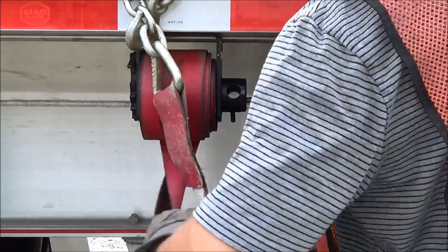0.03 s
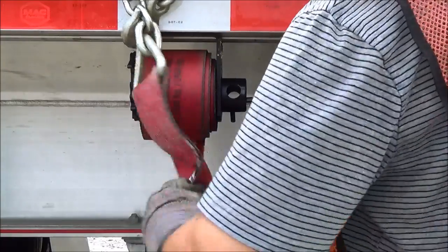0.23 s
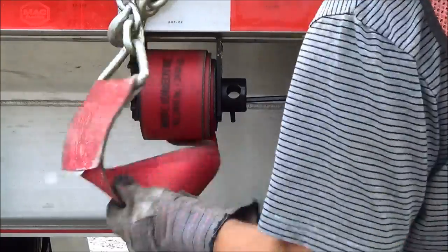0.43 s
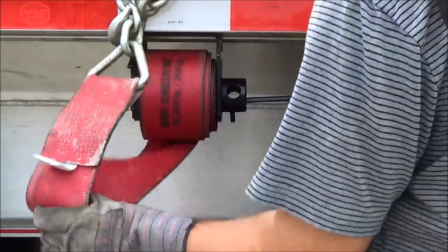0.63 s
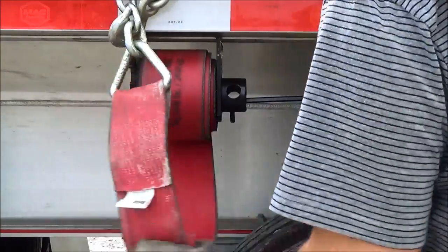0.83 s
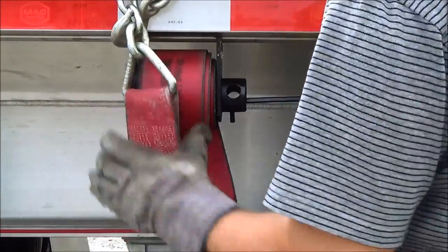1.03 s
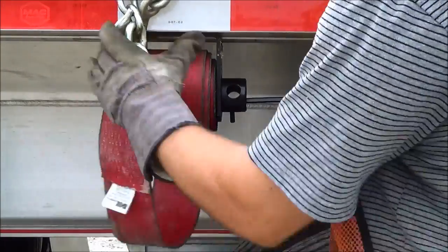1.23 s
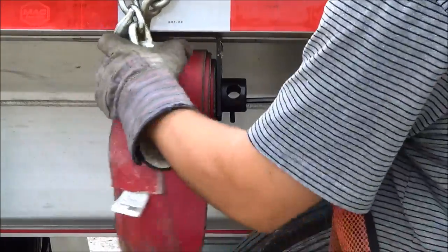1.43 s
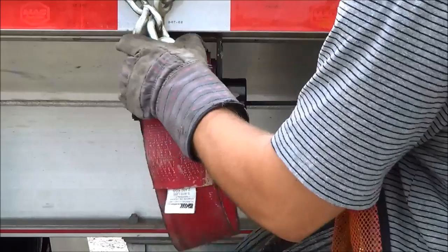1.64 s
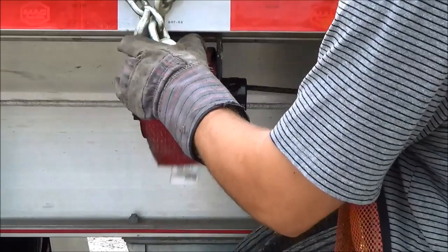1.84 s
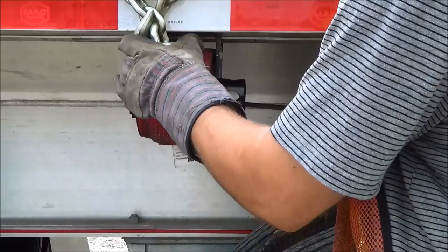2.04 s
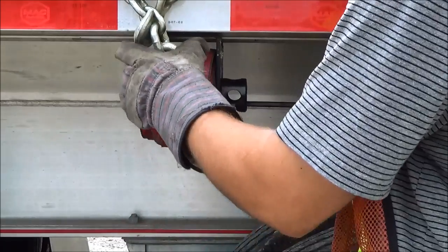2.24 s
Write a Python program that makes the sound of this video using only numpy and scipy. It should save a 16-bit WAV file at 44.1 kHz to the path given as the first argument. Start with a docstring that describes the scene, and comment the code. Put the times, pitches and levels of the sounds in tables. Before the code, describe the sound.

Chain links clink close by, with a few clanks from a hook as a strap is handled on a trailer outdoors. The clinking thins out, then builds into a busier, dragging rattle, with soft rustling and a steady low rumble beneath.

```python
"""At the winch of a flatbed trailer: a steel chain and hook clink and knock as a gloved hand moves a strap.
Free links ring until a neighbour stops them; then the chain drags over the trailer's edge in small slips.
The trailer's side answers each blow. Webbing rustles, a low outdoor rumble lies beneath,
and a limiter holds the peaks."""
import sys
import numpy as np
from scipy import signal
from scipy.fft import rfft, irfft, next_fast_len
from scipy.io import wavfile
from scipy.ndimage import uniform_filter1d, minimum_filter1d, map_coordinates

SR = 44100
rng = np.random.default_rng(int(sys.argv[2]) if len(sys.argv) > 2 else 0)


def unload_audio(sound):
    """Save the sound as a 16-bit wav file, at the path given as the first command line argument."""
    columns = np.transpose(np.atleast_2d(sound))
    # keep every value between -1 and 1, then stretch to whole-number steps
    steps = np.round(np.clip(columns, -1, 1) * 32767)
    wavfile.write(sys.argv[1], SR, steps.astype(np.int16))


N = 105840


def clinks():
    """Link hits link: a short crack, then the dense ring of chain and trailer."""
    # contacts: start_s, body_db, middle_db, treble_db, top_db
    contacts = [(0.2389, -24.5, -14, -18.5, -37), (0.3132, -23, -29.5, -29.5, -48),
                (0.3414, -53, -47, -20.5, -31), (.347, -34, -28, -17.5, -40), (0.372, -44, -21.5, -23, -51),
                (.449, -29, -23.5, -22.5, -48), (.459, -33, -22.5, -40, -49), (.585, -51, -19, -23, -39),
                (0.9436, -27.5, -29.5, -45, -54), (1.4807, -58, -28.5, -37.5, -79),
                (1.582, -22.5, -29.5, -39.5, -35.5), (1.64, -34, -24, -24, -29),
                (1.7238, -22, -25, -21, -31), (1.791, -43, -16.5, -26.5, -26),
                (1.8804, -17, -18.5, -17.5, -17), (1.932, -16, -24, -24.5, -27.5),
                (2.0204, -21, -30, -25.5, -24.5), (2.145, -20.5, -20, -36.5, -70)]
    out, t = np.zeros((2, N)), np.arange(SR // 2) / SR
    crack = amp(-3.5) * fade(t, t60_s=0.042)
    for start_s, *levels_db in contacts:
        ring = steel(noise(len(t)))
        for k, level_db in enumerate(levels_db):
            envelope = np.hypot(crack, trailer_answer(k, t))
            add(out, start_s, amp(level_db) * band(ring, k) * envelope)
    return out


def hook_knocks():
    """The strap-damped hook clanks in its link; where it is struck weights its low modes."""
    # blows: start_s, level_db, low_lift_db
    blows = [(.116, -36.5, -6), (.347, -11.5, -18), (.586, -21.5, -6), (.943, -14.5, 5.5),
             (1.31, -31.5, -5),(1.482, -22, -1.5), (1.521, -26.5, -2), (1.573, -23.5, -12),
             (2.146, -37.5, 7)]
    # hook modes: pitch_hz, level_db
    modes = [(715, -17), (820, -13.5), (1290, -5), (1440, 0), (1620, -15)]
    # spectrum of the trailer's answer: freq_hz, relative_db
    answer_spectrum = [(120, -59), (200, -22), (616, -9), (860, 1), (985, -15.5), (1370, -1), (1670, -13),
                       (6000, -81)]
    scatter_db, detune, shelf_hz = 1.2, 0.015, 1050
    out, t = np.zeros((2, N)), np.arange(SR // 2) / SR
    for start_s, level_db, low_lift_db in blows:
        ring = np.zeros(len(t))
        for pitch_hz, mode_db in modes:
            ring += amp(mode_db + rng.normal(0, scatter_db)) * sine(pitch_hz * rng.normal(1, detune), t)
        ring *= rise(t, tau_s=0.00039) * fade(t, t60_s=0.066)
        answer = coloured(answer_spectrum, len(t)) * rise(t, tau_s=0.015) * fade(t, t60_s=0.28)
        clank = amp(level_db) * (ring + amp(-7) * answer)
        add(out, start_s, filtered(clank, lambda hz: amp(low_lift_db / (1 + (hz / shelf_hz) ** 10))))
    return out


def free_rings():
    """Links, hook and edge sing, wavering and chattering as they swing, until a neighbour damps them."""
    # modes by part name: pitch_hz, level_db, t60_s
    part_modes = {"first link": [(8848, 0, .9), (4712, -10, .5), (3980, -14, .35), (4377, -18, .5),
                  (5981, -21, .5), (10935, -20, .35)], "small link": [(10522, 0, .3), (10680, -11, .6)],
                  "long link": [(4692, 0, .25), (10670, -15, .45)], "singing link": [(8846, 0, .95)],
                  "heavy link": [(4398, 0, .2), (5787, -4, .2), (1852, -2, .2)],
                  "tapped link": [(4016, 0, .06), (4339, -9, .2)], "middle link": [(5711, 0, .3)],
                  "short link": [(10840, 0, .25), (10530, -1, .1), (5706, -2, .4)], "hook": [(850, 0, .5),
                  (1420, 3, .14)], "trailer edge": [(320, 0, .55), (440, -2, .35)]}
    # free spells: start_s, part, level_db, free_s
    spells = [(0.214, "first link", -52, 0.04), (0.24, "first link", -12, 0.032),
              (.252, "hook", -23.5, 0.046), (0.293, "small link", -27, 0.017),
              (0.342, "singing link", -39.5, .22), (0.369, "long link", -27, 0.068),
              (.385, "trailer edge", -29.5, 0.33), (0.587, "heavy link", -35, 0.052),
              (1.31, "tapped link", -37.5, 0.046), (1.638, "middle link", -26, .3),
              (1.88, "short link", -29.5, 0.28), (2.024, "short link", -32.5, 0.038)]
    waver_db, waver_per_s, chatter_per_s = 2.7, 70, 600
    out, t = np.zeros((2, N)), np.arange(SR // 2) / SR
    for start_s, part, level_db, free_s in spells:
        damping = fade(np.maximum(t - free_s, 0), t60_s=0.2)
        for pitch_hz, mode_db, t60_s in part_modes[part]:
            depth_db = waver_db * (1 - mode_db / 20)  # weak modes waver most
            waver = amp(depth_db * wander(t * waver_per_s, knots=200))
            chatter = 1 + 0.28 * wander(t * chatter_per_s, knots=600)
            tone = amp(level_db + mode_db) * sine(pitch_hz, t) * fade(t, t60_s)
            add(out, start_s, tone * waver * chatter * damping)
    return out


def chain_drag():
    """Many small slips rattle the trailer's edge, which booms under the pull."""
    # rattle envelope: time_s, body_db, middle_db, treble_db
    rattle_levels = [(1.54, -39, -46, -74), (1.62, -30.5, -39.5, -65), (1.715, -29.5, -34, -59),
                     (1.76, -30, -32.5, -40), (1.83, -25.5, -24.5, -34.5), (1.92, -23.5, -21, -34),
                     (2.0, -22, -24, -44), (2.04, -30.5, -31, -47), (2.3, -44, -64, -90)]
    # boom envelope: time_s, level_db
    boom_levels = [(1.8, -36), (1.92, -37.5), (2.0, -33.5), (2.11, -33), (2.3, -49)]
    # boom spectrum: freq_hz, relative_db
    boom_spectrum = [(30, -63), (90, -10.5), (300, -17), (700, -80)]
    slips_per_s, scatter_db, answer_db = 140, 3.5, 4
    t = np.arange(SR // 4) / SR
    onsets = rng.random(N) < slips_per_s / SR
    slips = onsets * amp(scatter_db * rng.standard_normal(N)) * rng.choice([-1, 1], N)
    grains = rattle(slips, fade(t, t60_s=0.02))
    out = amp(curves(boom_levels, outside_db=-120)) * coloured(boom_spectrum, N)
    body_db, middle_db, treble_db = curves(rattle_levels, outside_db=-120)
    top_db = treble_db - 4.5
    for k, level_db in enumerate([body_db, middle_db, treble_db, top_db]):
        answer = amp(answer_db) * rattle(slips, trailer_answer(k, t))
        out += amp(level_db) * band(steel(grains + answer), k)
    return out


def rattle(slips, envelope, segments=20):
    """Each slip rings as a noise burst; the ring changes as the chain moves on."""
    out, step = np.zeros((2, N)), N // segments
    for i in range(0, N, step):
        ring = noise(len(envelope)) * envelope
        add(out, i / SR, signal.fftconvolve(slips[None, i:i + step], ring))
    return unit(out)


def trailer_answer(k, t):
    """Envelope of the trailer's side in band k: builds after a blow, then dies away."""
    # one value per band, body to top
    level_db = [-4, -2.5, -3.5, -6.5]
    rise_s = [0.0082, 0.0078, 0.0052, 0.0035]
    t60_s = [0.35, 0.25, 0.16, 0.2]
    return amp(level_db[k]) * rise(t, rise_s[k]) * fade(t, t60_s[k])


def steel(x):
    """Colour x with the trailer's resonances and a fresh random set of the chain's."""
    # resonances of the trailer's side: centre_hz, lift_db
    panel = [(515, 4.5), (1040, -2), (1330, 6)]
    panel_q, ripple_step_hz = 7.2, 90
    scoop_hz = 2740  # hollow between the trailer's body and the links' brightness

    def response(hz):
        panel_db = sum(db / (1 + (2 * panel_q * (hz / centre_hz - 1)) ** 2) for centre_hz, db in panel)
        scoop_db = 5 * np.exp(-10 * np.log2((hz + 1) / scoop_hz) ** 2)
        ripple_db = 3 * wander(hz / ripple_step_hz, knots=500)
        return amp(panel_db - scoop_db + ripple_db)
    return filtered(x, response)


def strap():
    """Webbing and glove rustle; one soft swish as the strap slides through the hand."""
    # rustle envelope: time_s, level_db
    rustle_levels = [(.15, -38), (.55, -39), (.74, -49.5), (1.25, -46.5), (1.5, -38), (2.3, -92)]
    # rustle spectrum: freq_hz, relative_db
    rustle_spectrum = [(100, 4.5), (450, 11.5), (2000, -7.5), (11000, -24)]
    swish_s, width_s, swish_db = 0.821, 0.041, -53.5
    t = np.arange(N) / SR
    swish = amp(swish_db) * np.exp(-((t - swish_s) / width_s) ** 2) * band(noise(N), 3)
    rustle = amp(curves(rustle_levels)) * coloured(rustle_spectrum, N)
    return rustle + swish


def outdoor_rumble():
    """Steady low noise."""
    # rumble spectrum: freq_hz, relative_db
    spectrum = [(25, -17.5), (110, 0.5), (400, -5.5), (1100, -13), (2300, -27), (11000, -44.5)]
    return amp(-40) * coloured(spectrum, N)


def amp(db):
    return 10 ** (np.asarray(db) / 20)


def unit(x):
    return x / np.sqrt(np.mean(x ** 2) + 1e-20)


def rise(t, tau_s):
    return 1 - np.exp(-t / tau_s)


def fade(t, t60_s):
    return np.exp(-np.log(1000) * t / t60_s)


def sine(hz, t):
    """Tone at rms 1, random phase."""
    return np.sqrt(2) * np.sin(2 * np.pi * (hz * t + rng.random()))


def wander(position, knots):
    """Smooth random curve, one knot per unit of position."""
    return map_coordinates(rng.standard_normal(knots), [position], mode="mirror")


def along(points, hz):
    """Interpolate (freq_hz, value) points on a log axis."""
    freq_hz, values = np.transpose(points)
    return np.interp(np.log(hz + 1), np.log(freq_hz + 1), values)


def curves(rows, outside_db=None):
    """One value per sample for each column after time_s."""
    time_s, *columns = np.transpose(rows)
    return np.array([np.interp(np.arange(N) / SR, time_s, db, outside_db, outside_db) for db in columns])


def filtered(x, response):
    """Multiply the spectrum of x by response(hz)."""
    n = x.shape[-1]
    size = next_fast_len(n + 4096)
    return irfft(rfft(x, size) * response(np.fft.rfftfreq(size, 1 / SR)), size)[..., :n]


def band(x, k):
    """Band k of x at rms 1: 0 body, 1 middle, 2 treble, 3 top."""
    # band limits: edge_hz
    edges_hz = [320, 750, 2400, 5900, 12500]
    low_hz, high_hz = edges_hz[k:k + 2]
    return unit(filtered(x, lambda hz: ((1 + (low_hz / (hz + 1)) ** 10) * (1 + (hz / high_hz) ** 10)) ** -.5))


def noise(n):
    """Near-white stereo noise; the channels match in the bass and part slightly above."""
    mid, side = rng.standard_normal((2, n))
    side = amp(-8) * filtered(side, lambda hz: hz / np.hypot(hz, 600))
    return unit(np.array([mid + side, mid - side]))


def coloured(spectrum, n):
    """Noise at rms 1 with the given spectrum."""
    return unit(filtered(noise(n), lambda hz: amp(along(spectrum, hz))))


def add(out, start_s, x):
    part = out[:, round(start_s * SR):][:, :x.shape[-1]]
    part += x[..., :part.shape[1]]


def scene():
    return clinks() + hook_knocks() + free_rings() + chain_drag() + strap() + outdoor_rumble()


def record(dry):
    """Offset the channels in phase and level, limit the peaks, cut the top."""
    # left ahead of right: freq_hz, phase_rad
    lead = [(70, 0.36), (500, 1), (9000, 0.19)]
    tilt_db, ceiling, hold_s, cutoff_hz = 0.5, 0.27, 0.0077, 11150
    sides = np.array([[.5], [-.5]])
    x = filtered(dry, lambda hz: amp(sides * tilt_db) * np.exp(1j * sides * along(lead, hz)))
    hold = int(hold_s * SR)
    needed_gain = np.minimum(1, ceiling / (np.abs(x).max(axis=0) + 1e-9))
    gain = uniform_filter1d(minimum_filter1d(needed_gain, hold), hold)
    return filtered(x * gain, lambda hz: amp(-np.clip((hz - cutoff_hz) / 14, 0, 120)))


dry = scene()
out = record(dry)
unload_audio(out)
```